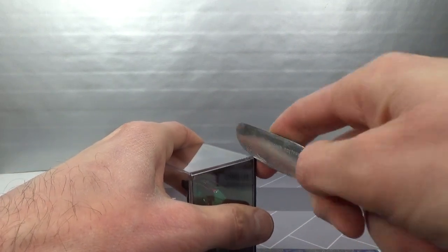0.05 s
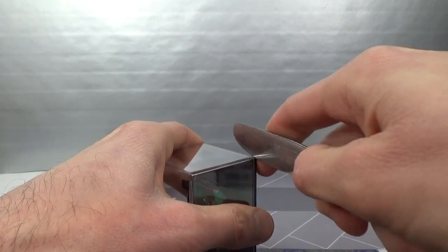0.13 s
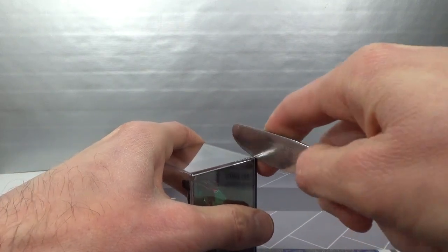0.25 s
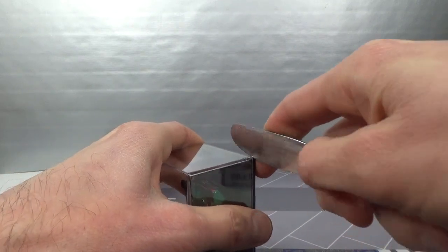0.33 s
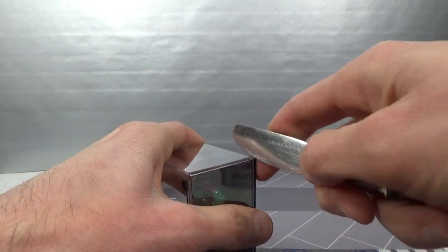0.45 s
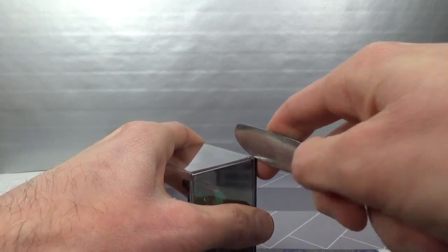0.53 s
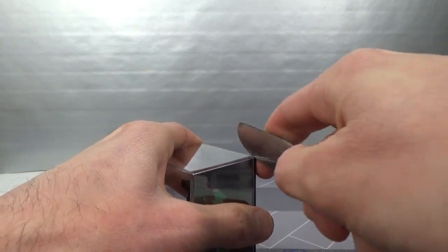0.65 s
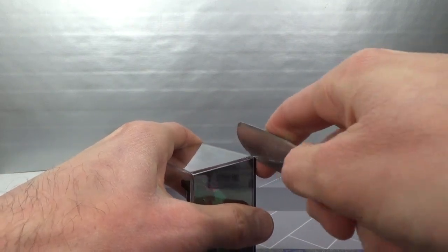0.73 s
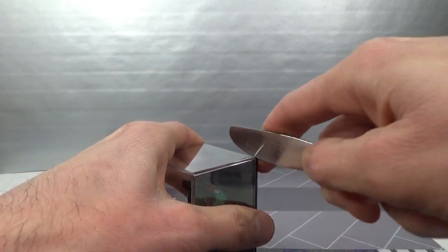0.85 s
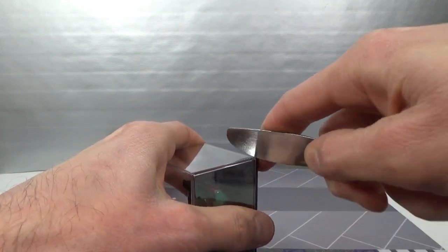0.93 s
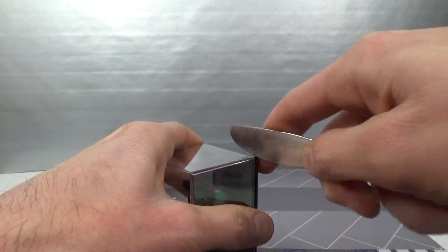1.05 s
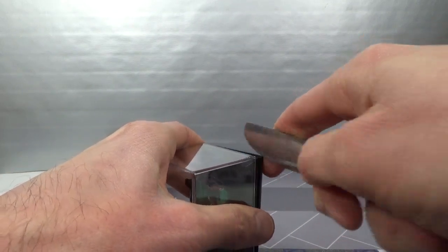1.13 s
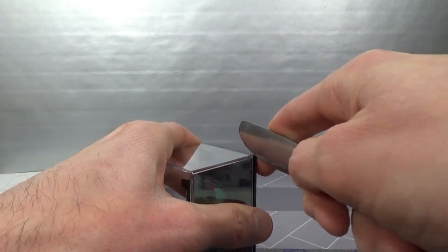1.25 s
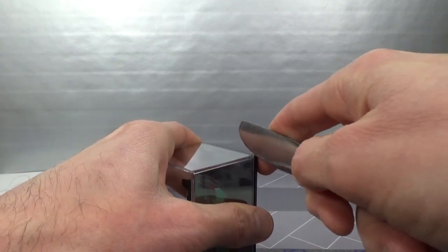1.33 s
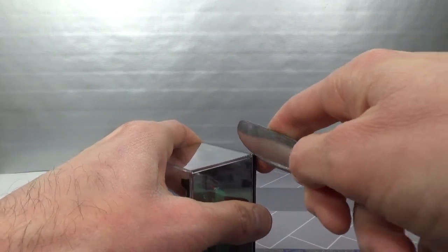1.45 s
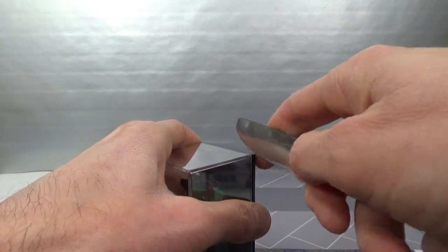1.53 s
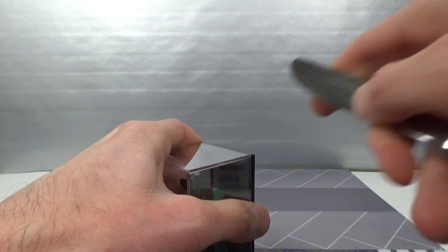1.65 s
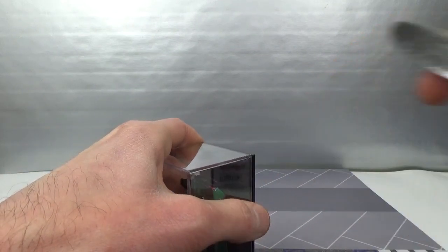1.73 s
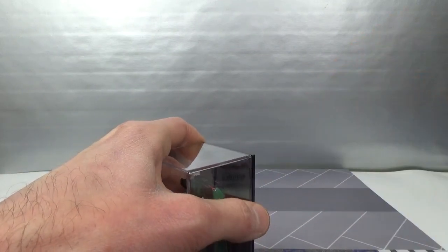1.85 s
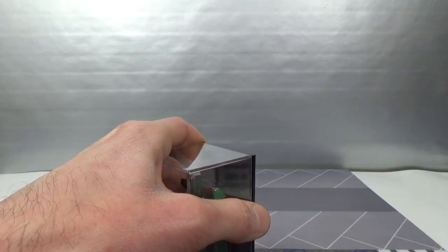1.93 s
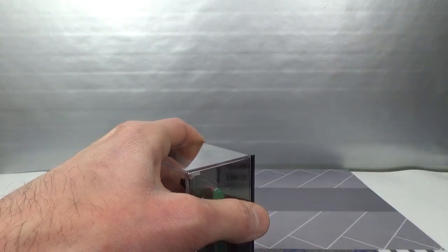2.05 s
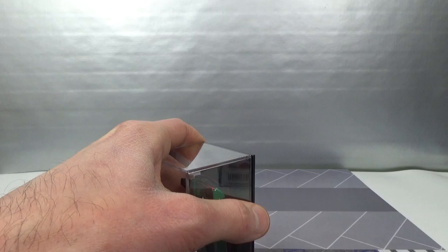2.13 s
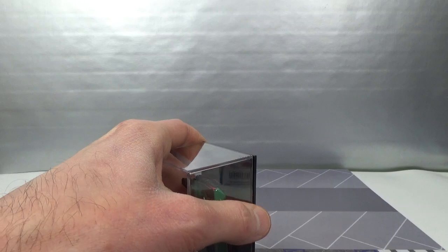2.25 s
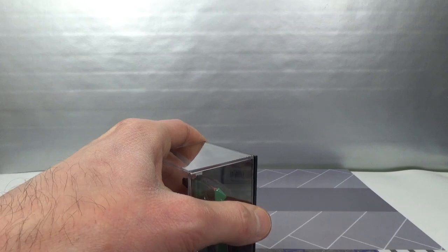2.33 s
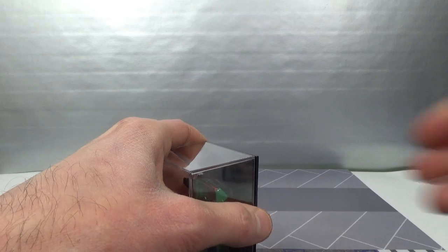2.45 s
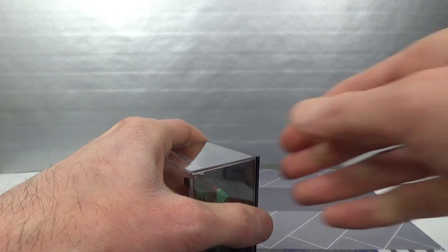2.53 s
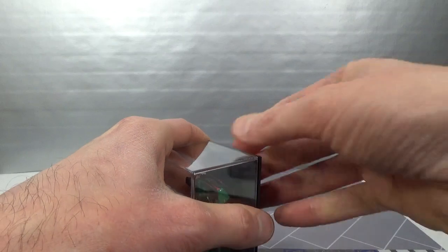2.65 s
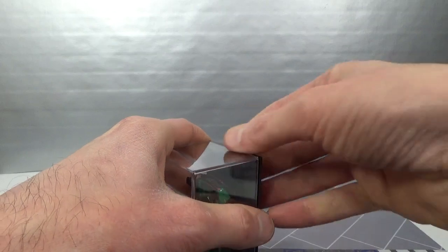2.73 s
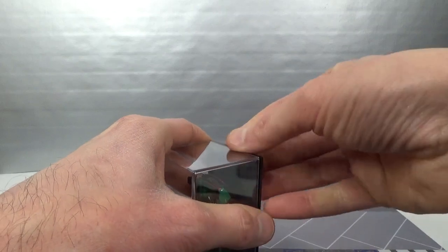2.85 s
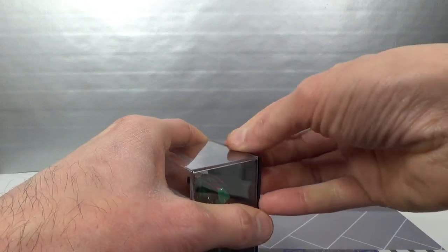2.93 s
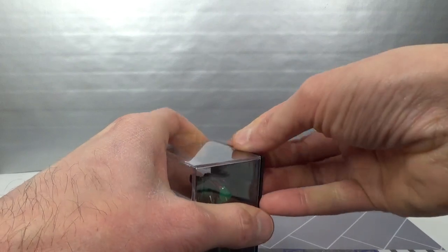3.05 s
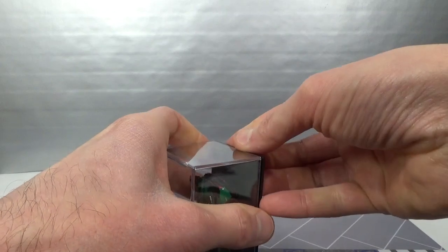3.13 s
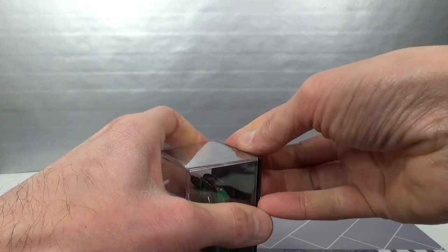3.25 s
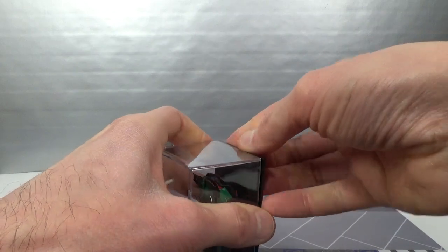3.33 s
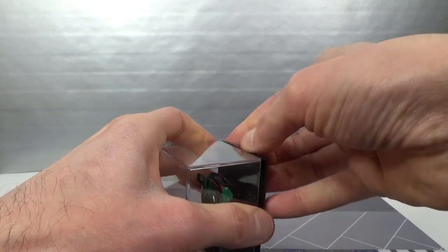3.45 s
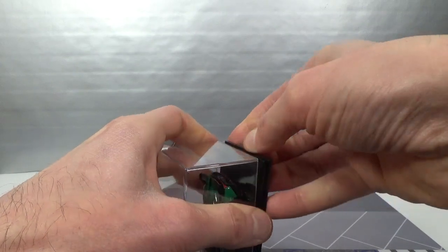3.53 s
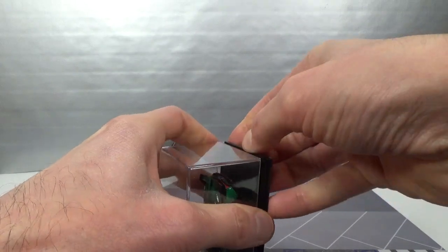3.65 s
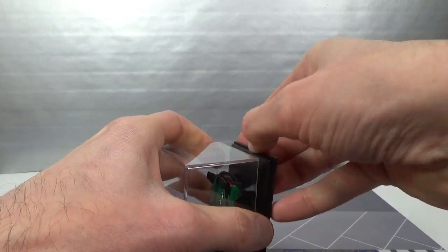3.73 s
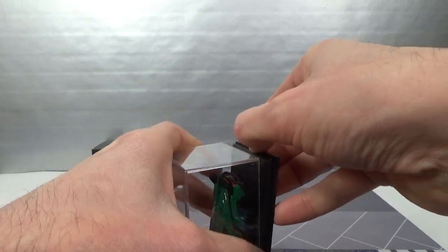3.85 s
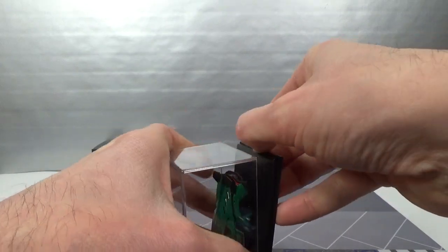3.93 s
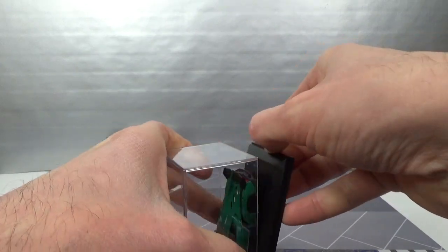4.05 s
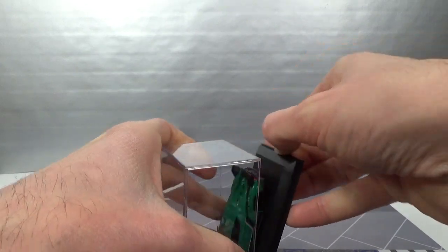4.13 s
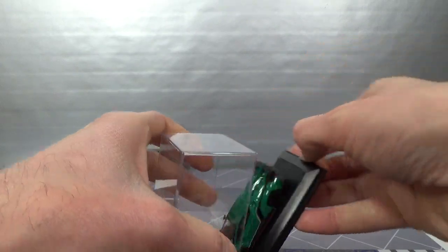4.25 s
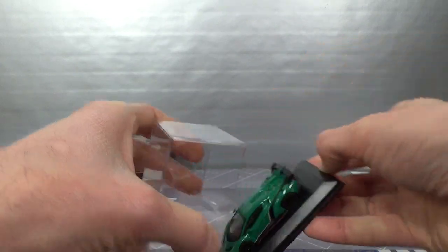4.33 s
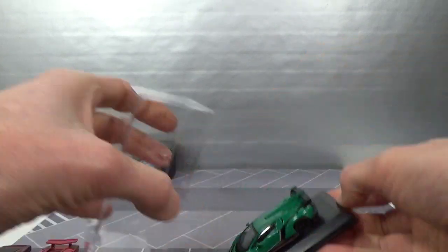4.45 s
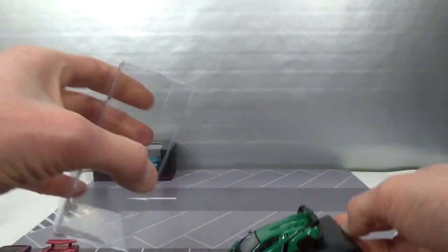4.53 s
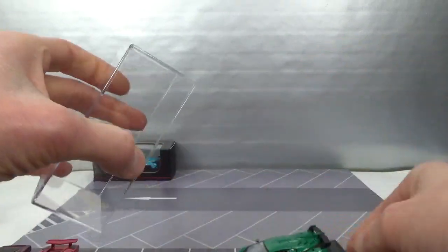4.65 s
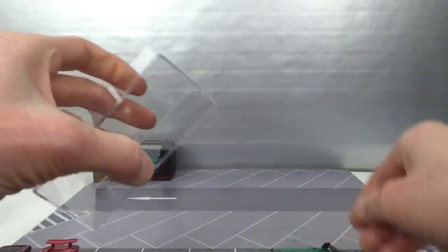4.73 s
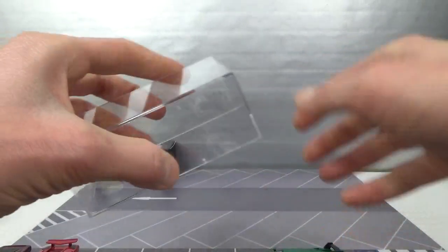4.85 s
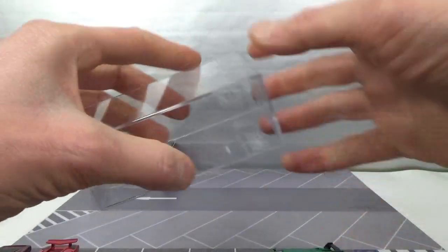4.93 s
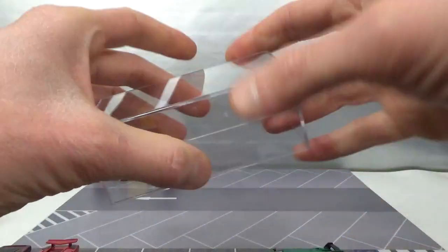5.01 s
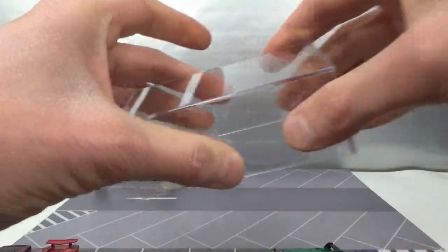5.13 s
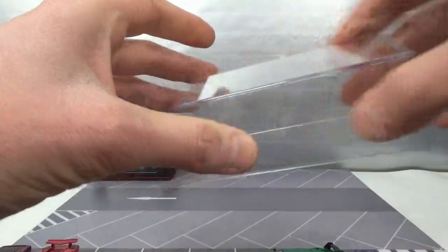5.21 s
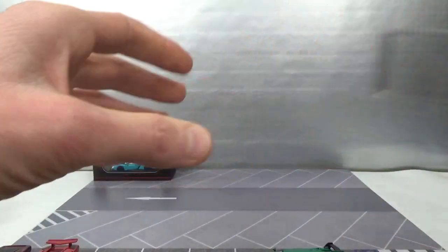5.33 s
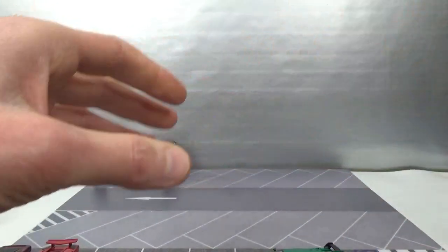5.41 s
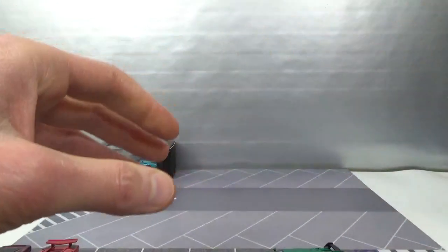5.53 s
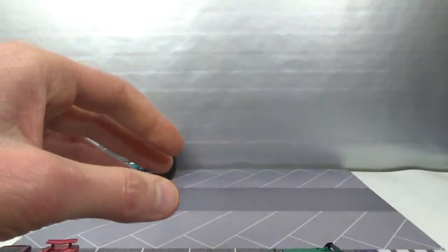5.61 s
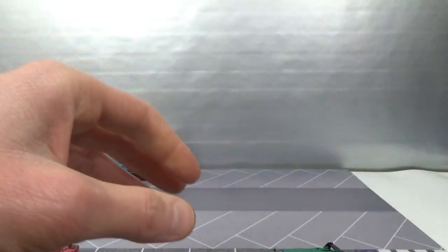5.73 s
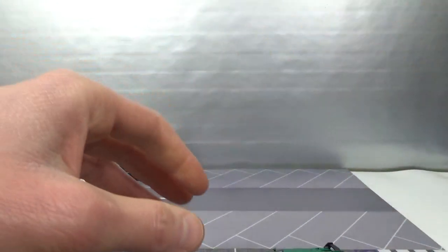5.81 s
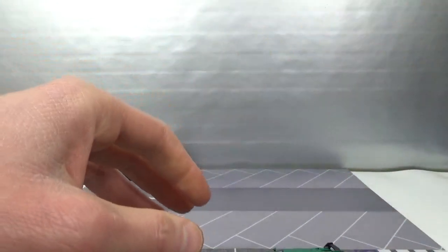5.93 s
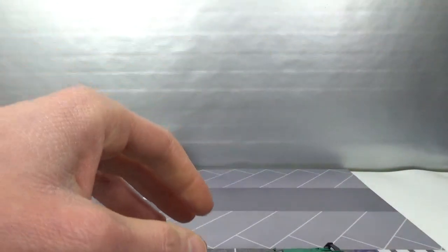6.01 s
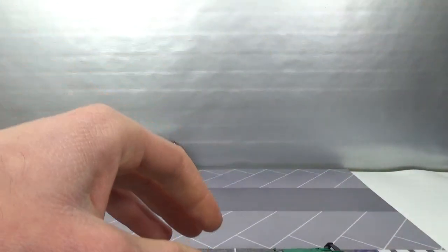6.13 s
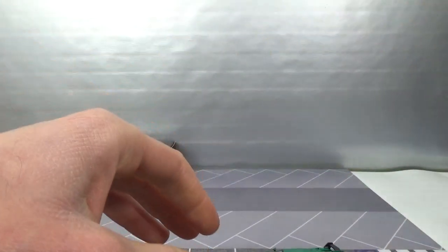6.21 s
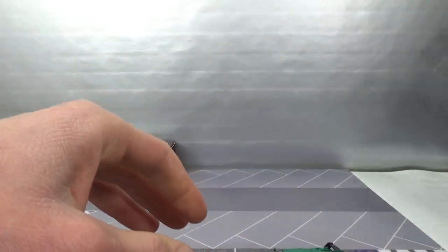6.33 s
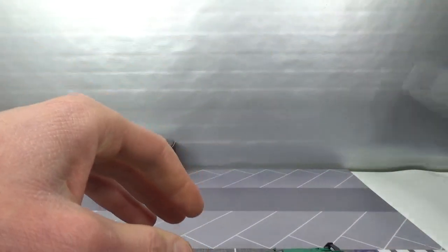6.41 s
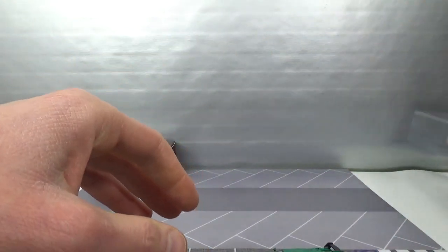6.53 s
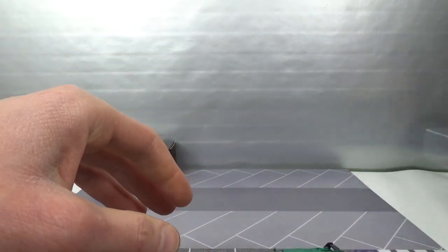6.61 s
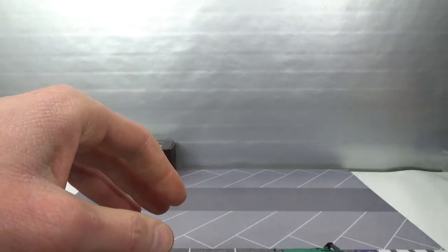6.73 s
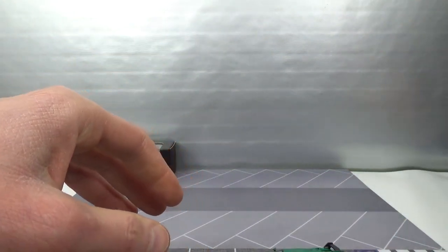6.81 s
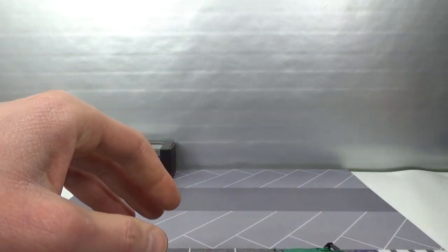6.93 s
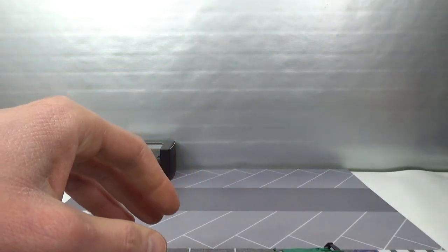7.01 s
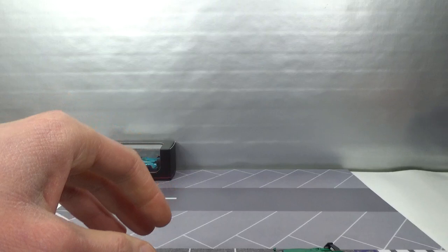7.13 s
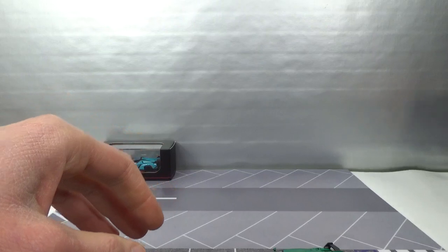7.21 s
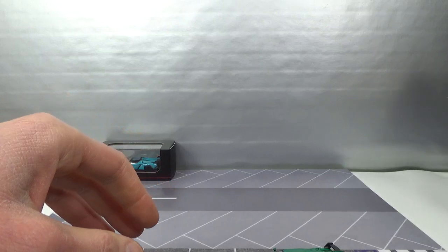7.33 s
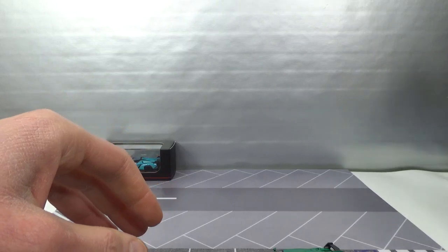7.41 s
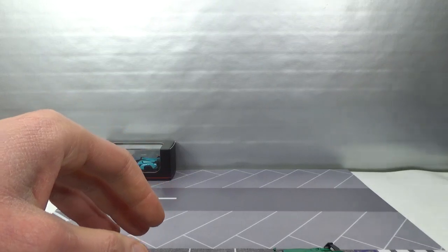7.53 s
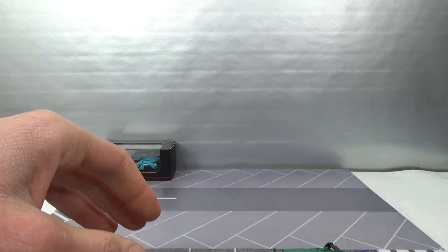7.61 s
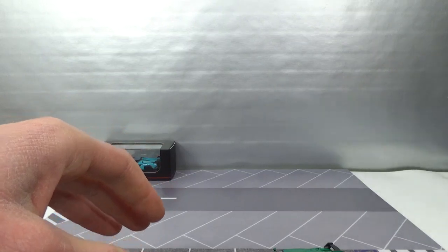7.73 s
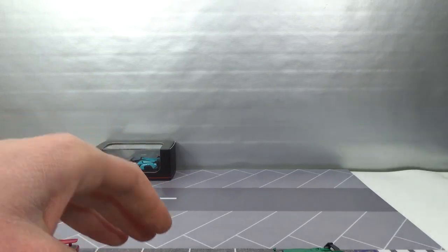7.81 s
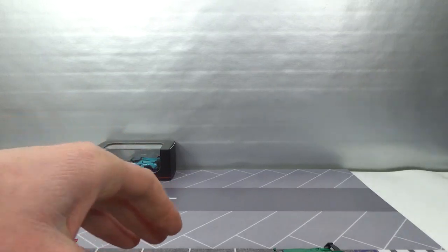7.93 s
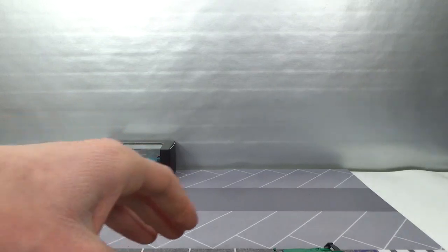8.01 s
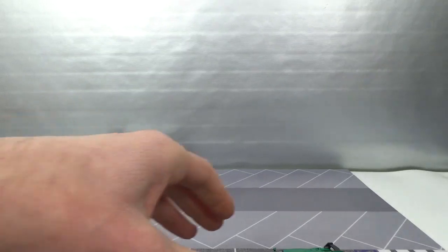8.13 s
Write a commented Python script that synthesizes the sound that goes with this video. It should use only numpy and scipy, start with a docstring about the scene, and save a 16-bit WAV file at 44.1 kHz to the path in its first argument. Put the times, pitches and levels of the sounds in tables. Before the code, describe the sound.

Close clicks and creaks of a hard plastic case being pried open, a loud snap, then thumps and a short knocking drag.

```python
"""In a small, quiet room, a clear plastic display case is tapped, then a table knife pries at its seam (1 s)
and is laid on a mat-covered table, its steel ringing (2.3 s). Fingers stick and slip on the walls in
short squeaks until the base snaps out of the cover (3.9 s). Base and cover are put down with soft
thumps (4.5 s), and the empty cover ticks and rings faintly as it is turned over (5 s). Last, further
right, a case is dragged a short way, knocking each time it catches on the mat (6.8 s)."""
import sys
import numpy as np
from scipy import signal
from scipy.fft import rfft, irfft
from scipy.io import wavfile
from scipy.ndimage import uniform_filter1d

SR = 44100
rng = np.random.default_rng(int(sys.argv[2]) if len(sys.argv) > 2 else 0)


def bounce(signal):
    """Save signal as a 16-bit WAV file at the path given by the first command-line argument."""
    frames = np.transpose(np.atleast_2d(signal))
    limited = np.clip(frames, -1, 1)
    pcm = np.round(limited * 32767).astype(np.int16)
    wavfile.write(sys.argv[1], SR, pcm)


N = 360297
T = np.arange(N) / SR
RING_T = T[:SR // 4]  # time axis of one hit and its tail


def undb(db):
    """Decibels to gain."""
    return 10 ** (np.asarray(db) / 20)


def add(out, s, x):
    """Mix x into out from time s on."""
    i = max(int(s * SR), 0)
    out[i:i + len(x)] += x[:max(len(out) - i, 0)]


def level(x, db=0):
    """Scale to an rms level."""
    return x * undb(db) / np.sqrt(np.mean(x ** 2))


def hit_level(x, db, length=.01):
    """Scale a short sound to the energy of that level held for length seconds."""
    return x * undb(db) * np.sqrt(length * SR / np.sum(x ** 2))


def on_bins(points, size):
    """Join (Hz, value) points over log frequency, on the bins of a transform."""
    hz, value = np.transpose(points)
    bin_hz = np.arange(size // 2 + 1) * SR / size
    return np.interp(np.log(bin_hz + 1), np.log(hz), value)


def colour(x, points):
    """Shape a steady sound with an EQ curve."""
    return irfft(rfft(x) * undb(on_bins(points, len(x))), len(x))


def response(points, size=1024):
    """Minimum-phase impulse response of an EQ curve."""
    cepstrum = irfft(np.log(undb(on_bins(points, size))))
    cepstrum[1:size // 2] *= 2
    cepstrum[size // 2 + 1:] = 0
    return irfft(np.exp(rfft(cepstrum)))


def through(x, impulse):
    """Drive an impulse response with x."""
    return signal.oaconvolve(x, impulse)[:len(x)]


def low_cut(x, hz):
    """Roll off the lows: small things radiate little bass."""
    return signal.sosfilt(signal.butter(2, hz, "high", fs=SR, output="sos"), x)


def fade(t60):
    """Exponential decay, 60 dB down after t60 seconds."""
    return np.exp(-np.log(1000) * RING_T / t60)


def grit(count, spread_db):
    """Tiny impacts of very unequal size."""
    return rng.standard_normal(count) * undb(spread_db * rng.standard_normal(count))


def wander(rate):
    """Smooth random drift with rate turning points a second, spread near 1."""
    knots = rng.standard_normal(N)
    return uniform_filter1d(np.interp(T * rate, np.arange(N), knots), int(SR / rate / 2) + 1)


# tone of the air and hiss: (frequency [Hz], relative level [dB])
AIR_EQ = [(15, -39.5), (25, -10), (69, -17), (81, -6.5), (101, -7), (156, -12), (207, -8.5), (372, -15.5),
          (907, -16), (1710, -22.5), (2450, -22.5), (5260, -27), (8750, -26.5), (11000, -29.5),
          (14300, -57), (22000, -120)]
# their stereo width: (frequency [Hz], side minus mid [dB])
AIR_SIDE_EQ = [(60, -18.5), (110, -14.5), (190, -12), (350, -3), (620, -1), (2000, -0.5), (6400, -6),
               (11400, -10)]


def room_tone(air_db=-63.5, hum_hz=100, hum_db=-69.5):
    """The bed: room air, microphone hiss and a faint wavering mains hum."""
    mid, side = (level(colour(rng.standard_normal(N), AIR_EQ), air_db) for _ in range(2))
    side = colour(side, AIR_SIDE_EQ)
    phase = 2 * np.pi * hum_hz * T + .4 * wander(rate=5)
    mid = mid + level(np.sin(phase) + undb(-8) * np.sin(2 * phase), hum_db)
    return np.array([mid + side, mid - side])


# the small room's tail: (band centre [Hz], t60 [s], level [dB])
REVERB_BANDS = [(70, .3, -14), (150, .3, -8.5), (300, 0.19, -6.5), (700, 0.17, -10), (1600, 0.16, -7.5),
                (4024, .21, -10.5), (9900, 0.16, -10.5)]


def reverb(x, predelay_s=.0017, wide_hz=600, width=.76):
    """Short diffuse reverberation; the bass lingers and stays near the centre."""
    size = len(RING_T)
    noise, tail = rfft(rng.standard_normal((2, size))), 0
    onset = np.clip(RING_T / predelay_s - 1, 0, 1)
    for hz, t60, db in REVERB_BANDS:
        band = on_bins([(row[0], row[0] == hz) for row in REVERB_BANDS], size)
        envelope = hit_level(fade(t60) * onset, db, 1 / SR)
        mid_side = np.array([[1], [width * hz / (hz + wide_hz)]])
        tail = tail + irfft(noise * band, size) * envelope * mid_side
    mid, side = through(x, tail[0]), through(x, tail[1])
    return np.array([mid + side, mid - side])


def ring(modes, length, scatter_db=1):
    """Free ringing that builds up during the contact; each point of contact favours other modes."""
    chance = rng.standard_normal((len(modes), 2))
    tone = sum(undb(db + scatter_db * nudge) * np.sign(flip) * fade(t60) * np.sin(2 * np.pi * hz * RING_T)
               for (hz, db, t60), (nudge, flip) in zip(modes, chance))
    return tone * (1 - np.exp(-2 * RING_T / length))


# modes of the clear cover: (frequency [Hz], relative level [dB], t60 [s])
COVER_MODES = [(900, -8.5, 0.14), (1116, -3.5, .16), (1550, -6, .06), (1850, -2.5, .06), (2085, 1.5, 0.06),
               (2343, 1.5, 0.068), (2960, -11, .07), (3280, -12.5, 0.088), (3440, -7.5, .05),
               (3833, -9.5, .06), (4352, -9, .07)]


def cover_ring(length):
    """The thin plastic cover rings after a contact of length seconds."""
    return ring(COVER_MODES, length)


# tone of brushing skin: (frequency [Hz], relative level [dB])
SKIN_EQ = [(100, -5.5), (400, 2.5), (1000, -2.5), (2400, -3.5), (5000, -5), (9500, 1.5), (11200, -9.5),
           (13000, -40)]
# hands passing over plastic and mat: (time [s], peak level [dB], half-width [s])
HAND_MOVES = [(0.374, -70, 0.029), (2.03, -57.5, 0.012), (2.807, -61, 0.03), (2.928, -61, 0.055),
              (3.266, -61, .007), (3.748, -61.5, 0.49), (4.224, -65.5, 0.17), (5.019, -45.5, 0.016),
              (5.098, -53, 0.021), (5.176, -57.5, 0.044), (5.419, -61.5, 0.021), (5.495, -70.5, 0.26),
              (6.153, -71, .1), (6.369, -58, .012), (6.483, -66, 0.21), (8.10, -58, 0.032)]


def hand_brushes(cover_db=-8.5, lift_s=4.1, let_go_s=5.9):
    """Soft swells of skin hiss; while the lifted cover is in the hands, they set it singing faintly."""
    pressure = sum(undb(db) * np.exp(-2 * ((T - s) / width) ** 2) for s, db, width in HAND_MOVES)
    hiss = pressure * level(colour(grit(N, spread_db=5), SKIN_EQ)) * undb(1.5 * wander(rate=60))
    on_cover = hiss * (T > lift_s) * (T < let_go_s)
    return hiss + through(on_cover, hit_level(cover_ring(length=.00091), cover_db, 1 / SR))


# weight landing on the table: (time [s], pitch [Hz], level [dB])
LANDINGS = [(.002, 150, -45), (0.359, 125, -58), (1.495, 158, -49.5), (1.548, 157, -45),
            (2.089, 160, -36.5), (2.1245, 150, -47), (2.291, 163, -24), (2.752, 65, -49.5),
            (3.042, 210, -45), (3.501, 200, -46.5), (3.639, 160, -47), (3.68, 110, -52), (3.819, 110, -41),
            (3.842, 110, -45), (3.86, 140, -45), (4.517, 123, -29.5), (4.782, 150, -23.5),
            (5.055, 170, -50), (5.202, 170, -54), (6.846, 206, -30.5), (8.011, 90, -50.5)]


def table_thumps(decay_cycles=.23, table_hz=156, table_t60=.14, hum_db=-12, build_s=.023):
    """The low end: the padded table gives way, swings back and hums on briefly at its own note."""
    out = np.zeros(N)
    hum = np.sin(2 * np.pi * table_hz * RING_T) * fade(table_t60) * (1 - np.exp(-(RING_T / build_s) ** 2))
    for s, hz, db in LANDINGS:
        cycles = hz * RING_T
        swing = cycles ** 2 * np.exp(-cycles / decay_cycles) * np.sin(2 * np.pi * cycles)
        add(out, s, hit_level(low_cut(swing, hz=41.6), db) + hit_level(hum, db + hum_db))
    return out


def hollow(hz, t60=.018, upper_ratio=1.563, upper_db=-8.5, cut_ratio=.52):
    """A damped body flexing as a whole: one note and a weaker one above it."""
    notes = np.sin(2 * np.pi * hz * RING_T) + undb(upper_db) * np.sin(2 * np.pi * hz * upper_ratio * RING_T)
    return low_cut(notes * fade(t60), cut_ratio * hz)


def clack(eq, t60, attack):
    """A sharp transient followed by a crowd of quickly dying modes."""
    impulse = hit_level(rng.standard_normal(len(RING_T)) * fade(t60), 0, 1 / SR)
    impulse[0] += attack
    return through(impulse, response(eq))


# tone of the walls, and of the crack at the contact point: (frequency [Hz], relative level [dB])
WALL_EQ = [(300, -28), (900, -6), (1400, 5.5), (2000, 4.5), (2700, -0.5), (3600, 0), (4600, -4.5),
           (6500, -15), (11000, -38)]
CRACK_EQ = [(1500, -30), (3500, -1.5), (4800, -0.5), (6200, 0.5), (7600, 0.5), (8700, 1), (10000, 1.5),
            (11200, -11), (13000, -42)]


def walls_and_crack():
    """The plastic's two upper layers, as impulse responses: midrange clack and bright crack."""
    return clack(WALL_EQ, t60=.018, attack=.75), clack(CRACK_EQ, t60=.016, attack=1)


def layer_levels(db, hardness_db, crack_db):
    """Split a level into body, walls and crack; hardness is walls over body, crack is crack over walls."""
    layers = np.array([0, hardness_db, hardness_db + crack_db])
    return db + layers - 10 * np.log10(np.sum(undb(layers) ** 2))


def contact(length, attack=.41):
    """A first impact, then edges chattering for length seconds; the briefest contacts are one clean hit."""
    chatter = grit(len(RING_T), spread_db=2.5) * np.exp(-(RING_T / length) ** 3)
    force = hit_level(chatter, 0, 1 / SR)
    force[0] += attack * (.0024 / length) ** 1.3
    return force


def strike(length, hz, db, hardness_db, crack_db, ring_db):
    """One contact drives body, walls and crack, and leaves the cover ringing."""
    force = contact(length)
    layers = low_cut(hollow(hz), .42 * hz), *walls_and_crack()
    levels = layer_levels(db, hardness_db, crack_db)
    knock = sum(hit_level(through(force, layer), layer_db) for layer, layer_db in zip(layers, levels))
    return knock + hit_level(cover_ring(length), db + ring_db)


# fingertips on the empty cover: (time [s], contact length [s], level [dB])
FINGERTIPS = [(4.9453, .005, -50), (5.0532, .0047, -52), (5.115, .0027, -46.5), (5.1597, .0044, -44),
              (5.1822, .0047, -49), (5.2012, .003, -49), (5.65, .0037, -59), (5.6892, .0035, -55)]


def cover_ticks(hz=1100, hardness_db=10.5, crack_db=-4.5, ring_db=-6):
    """The empty cover is turned over: thin ticks with little body."""
    out = np.zeros(N)
    for s, length, db in FINGERTIPS:
        add(out, s, strike(length, hz, db, hardness_db, crack_db, ring_db))
    return out


# tone of the walls under a sliding edge: (frequency [Hz], relative level [dB])
RUB_EQ = [(150, -5), (400, -17), (1000, -0.5), (1800, -2), (2800, -2), (3700, -4.5), (4600, -7.5),
          (6500, -13.5), (11000, -34.5)]


def scrape(envelopes, body_hz, judder_db):
    """An edge catches on countless specks under unsteady pressure; its motion blurs the fine modes."""
    force = grit(N, spread_db=5.5) * undb(judder_db * wander(rate=160))
    layers = hollow(body_hz, t60=.0089, upper_db=-11.5), response(RUB_EQ), response(CRACK_EQ)
    return sum(envelope * level(through(force, layer)) for envelope, layer in zip(envelopes, layers))


# short scrapes: (peak time [s], 20 dB rise [s], 20 dB fall [s], level [dB], hardness [dB], crack [dB])
SCRAPES = [(1.155, .025, .035, -43, -2, -2), (1.24, .12, .2, -56, -18, -3), (3.11, .11, .025, -50, -8, -1),
           (3.872, .033, .032, -27.5, 2, -9), (3.91, .03, .1, -46, 0, -5), (4.56, .025, .1, -50, 0, -6),
           (4.615, .07, .14, -46.5, 2.5, -4.5), (4.722, .04, .055, -35, 22, -5),
           (4.805, .025, .05, -35, -1.5, -8)]


def plastic_slides():
    """Plastic slides over plastic and mat in brief scrapes that swell and die away."""
    envelopes = 0
    for s, rise, fall, *mix in SCRAPES:
        swell_db = -20 * np.maximum((s - T) / rise, (T - s) / fall).clip(max=8)
        envelopes = envelopes + np.outer(undb(layer_levels(*mix)), undb(swell_db))
    return scrape(envelopes, body_hz=650, judder_db=2.5)


# the scrape along the mat: (start [s], stop [s], 20 dB fall [s], level between slips [dB], hardness [dB])
DRAG_MOVE = (6.753, 7.055, .06, -40.3, -1.5)
# snags on the mat: (time [s], contact length [s], body pitch [Hz], level [dB], hardness [dB])
SNAGS = [(6.758, .011, 630, -31.5, 2), (6.7875, .0067, 678, -29, -9), (6.811, .005, 595, -35.5, -14),
         (6.844, .0055, 670, -32, -2), (6.887, .002, 1040, -37.5, 3), (6.895, .0034, 770, -35.5, -3),
         (6.928, .0016, 680, -30.5, -7), (6.971, .003, 587, -31, -3.5), (7.028, .0078, 570, -29, 1),
         (7.048, .0054, 520, -37.5, 1)]
# pushes that start and end the drag: (time [s], half-width [s], rasp level [dB])
DRAG_PUSHES = [(6.768, .016, -41), (7.042, .02, -38.5)]


def case_drag(crack_db=-8, ring_db=-22.5, slip_db=3.5, slip_s=.018, wall_hz=2800):
    """A dragged case knocks at each snag and slips faster just after; a firm push makes its wall rasp."""
    start, stop, fall, db, hardness_db = DRAG_MOVE
    slip = sum((T > s) * np.exp(-np.abs(T - s) / slip_s) for s, *_ in SNAGS)
    speed = (T > start) * undb(slip_db * slip - 20 * np.maximum(T - stop, 0) / fall)
    envelopes = np.outer(undb(layer_levels(db, hardness_db, crack_db)), speed)
    out = scrape(envelopes, body_hz=610, judder_db=3)
    push = sum(undb(rasp_db) * np.exp(-((T - s) / width) ** 2) for s, width, rasp_db in DRAG_PUSHES)
    rasp = level(through(grit(N, spread_db=4), hollow(wall_hz, t60=.004, upper_db=-14)))
    out += (T > start) * push * rasp
    for s, *snag in SNAGS:
        add(out, s, strike(*snag, crack_db, ring_db))
    return out


# stick-slip of skin and tight plastic: (time [s], length [s], start rate [slips/s], end rate [slips/s],
# body pitch [Hz], roughness [0-1], level [dB], hardness [dB])
SLIP_TRAINS = [(2.823, .011, 530, 290, 700, .3, -39.5, -6), (2.879, .029, 312, 355, 660, .08, -41.5, -23),
               (3.348, .022, 260, 220, 1156, .27, -48, 5), (3.402, .0078, 320, 580, 850, .75, -44, 2),
               (3.411, .012, 420, 290, 1400, .54, -45, -8), (3.509, .021, 380, 520, 620, 1, -40.5, -3),
               (3.527, .02, 520, 640, 962, .6, -38.5, -8), (3.751, .031, 300, 346, 970, .9, -44, -6)]


def finger_squeaks(crack_db=-7):
    """Short, nearly regular trains of slips drive the case; roughness jitters their timing and force."""
    out = np.zeros(N)
    for s, length, start_rate, end_rate, hz, rough, db, hardness_db in SLIP_TRAINS:
        count = int(length * (start_rate + end_rate) / 2) + 1
        time_jitter, force_jitter = rough * rng.standard_normal((32, 2))[:count].T
        periods = np.exp(.1 * time_jitter) / np.linspace(start_rate, end_rate, count)
        slips = ((np.cumsum(periods) - periods[0]) * SR).astype(int)
        force = np.zeros(len(RING_T))
        force[slips] = undb(4 * force_jitter) * np.hanning(count + 2)[1:-1] ** .3
        # the pressing finger damps the body, so every low harmonic comes through
        layers = hollow(hz, t60=.009, upper_db=-8, cut_ratio=.25), *walls_and_crack()
        for layer, layer_db in zip(layers, layer_levels(db, hardness_db, crack_db)):
            add(out, s, hit_level(through(force, layer), layer_db, length))
    return out


# modes of the steel knife: (frequency [Hz], relative level [dB], t60 [s])
STEEL_MODES = [(2280, -2, .06), (2840, 3, 0.036), (4775, -1.5, 0.2), (6130, -8, 0.18), (6901, -13, .12),
               (8750, 2.5, 0.24), (8985, -9, 0.21), (10200, -1, .06)]
# hits on the knife: (time [s], contact length [s], knock [dB], clack [dB], steel ring [dB])
KNIFE_HITS = [(1.14, 0.01, -52, -39.5, -57), (1.169, .003, -61, -64, -60),
              (2.2792, 0.0091, -43, -49.5, -67), (2.2912, 0.0027, -26.5, -36, -42.5)]


def knife_clinks(knock_hz=245):
    """The blade slips off the seam and later is laid down: what it hits knocks, and the steel rings."""
    out = np.zeros(N)
    body = hollow(knock_hz, t60=.032, upper_db=-17)
    walls, crack = walls_and_crack()
    for s, length, knock_db, clack_db, ring_db in KNIFE_HITS:
        force = contact(length)
        add(out, s, hit_level(through(force, body), knock_db))
        add(out, s, hit_level(through(force, walls + crack), clack_db))
        add(out, s, hit_level(ring(STEEL_MODES, length), ring_db))
    return out


# the blade bites into the seam: (time [s], contact length [s], level [dB])
BITES = [(1.062, .0014, -53), (1.0683, .0018, -47), (1.085, .0022, -44.5), (1.097, .0024, -48),
         (1.112, .0025, -38), (1.132, .008, -39), (1.1395, .0064, -28.5), (1.148, .0019, -32),
         (1.1531, .0031, -33), (1.168, .002, -41), (1.2143, .0012, -42), (1.2414, .0013, -39),
         (1.2689, .0014, -39), (1.4916, .0078, -40), (1.5495, .0054, -46), (1.561, .0027, -47)]
# tone of the bites as the blade sinks in: (time [s], body pitch [Hz], hardness [dB])
BITE_TONE = [(1.06, 1350, 7), (1.15, 720, 5.5), (1.215, 900, -5), (1.27, 720, -7), (1.55, 640, -20)]


def knife_pries(crack_db=1.5, ring_db=-24):
    """Sharp cracks at the lip of the seam turn to dull knocks as the blade goes deeper."""
    out = np.zeros(N)
    times, pitches, hardness = np.transpose(BITE_TONE)
    for s, length, db in BITES:
        hz, hardness_db = np.interp(s, times, pitches), np.interp(s, times, hardness)
        add(out, s, strike(length, hz, db, hardness_db, crack_db, ring_db))
    return out


# fingers and plastic edges knock on the case:
# (time [s], contact length [s], body pitch [Hz], level [dB], hardness [dB], crack [dB])
CASE_HITS = [(.002, .018, 1200, -42.5, -7, -6), (.079, .001, 1120, -53.5, -6, -11),
             (2.753, .0026, 1370, -52, 1, -9), (2.775, .002, 850, -56.5, -11, 0),
             (2.7887, .0013, 653, -51.5, -2, -8), (2.854, .0024, 665, -55, -21, 1),
             (3.043, .0008, 644, -37, -16, 5), (3.469, .0011, 580, -54, -8, -2),
             (3.501, .0034, 930, -37, 1, 0), (3.595, .0013, 980, -48.5, -7, 0),
             (3.616, .0062, 780, -42.5, -3.5, 5), (3.6261, .0013, 640, -37, -10, 0),
             (3.634, .0023, 586, -39, -7, -15), (3.6444, .0018, 700, -35.5, -18, -2),
             (3.677, .0046, 680, -52, 0, -7), (3.686, .0024, 626, -44, -21, 1),
             (3.7269, .009, 795, -49.5, -1, -3), (3.8208, .0024, 1020, -33, 2, 5),
             (3.825, .002, 1050, -31.5, 4, -5), (3.837, .0031, 1010, -39, -1, 4),
             (3.8445, .012, 1040, -30, -7.5, -2.5), (3.8584, .0094, 966, -15, 4.5, -1.5),
             (3.8745, .0028, 766, -27.5, 13, -19), (4.0428, .0019, 780, -44, 1, -2.5),
             (4.1245, .0034, 1080, -51.5, -17, 8), (4.136, .0018, 1190, -51, -6, -5),
             (4.1493, .0016, 1160, -41.5, -14, -3), (4.1806, .0018, 1030, -35.5, -2.5, -11),
             (4.5163, .004, 780, -27, 0, -2), (4.54, .0022, 790, -33.5, 4, -6),
             (4.553, .0018, 1000, -43, 12, 6), (4.67, .002, 1010, -47, -15, 13),
             (4.7809, .00054, 716, -16.5, -5.5, -2.5)]
# the cover rings more as the grip loosens, less as it tightens: (time [s], ring relative to the hit [dB])
GRIP_RING = [(3.68, -21), (3.8, -13), (4.15, -13), (4.18, -4.5), (4.54, -16), (4.78, -23)]
# modes of the base: (frequency [Hz], relative level [dB], t60 [s])
BASE_MODES = [(444, -12, .13), (722, -2.5, .12), (952, -1, 0.11), (1541, 0.5, .07), (1646, -4.5, .08),
              (1830, 0.5, .07), (2183, -3.5, .09), (2475, 2.5, .07), (2948, -9, .07), (4090, -6.5, 0.076),
              (4360, -11, .08), (4885, -5, .075), (6072, -11, .07), (7750, -10, .06), (9965, -8.5, .06)]
# the base springs free: (time [s], time to let go [s], ring level [dB])
BASE_RELEASE = (3.859, .005, -20.5)


def case_snaps():
    """Taps and snaps; the cover rings on when the hand lets it, the base when it springs free."""
    out = np.zeros(N)
    for s, *hit in CASE_HITS:
        ring_db = np.interp(s, *np.transpose(GRIP_RING))
        add(out, s, strike(*hit, ring_db))
    s, length, db = BASE_RELEASE
    add(out, s, hit_level(ring(BASE_MODES, length), db))
    return out


def pan(x, right_db):
    """Make the right channel louder than the left by right_db."""
    return x * undb(np.array([[-right_db], [right_db]]) / 2)


def scene(aside_from_s=6.6, aside_send_db=3.5):
    """The hands work near the middle; from the drag on, the sounds sit further right with more reverb."""
    foley = knife_pries() + case_snaps() + cover_ticks() + table_thumps() + knife_clinks()
    foley += finger_squeaks() + plastic_slides() + case_drag() + hand_brushes()
    near, aside = foley * (T < aside_from_s), foley * (T >= aside_from_s)
    direct = pan(near, right_db=1.34) + pan(aside, right_db=3.5)
    return direct + reverb(near + undb(aside_send_db) * aside) + room_tone()


def record(dry, top_hz=11150):
    """The nearby camera cuts the top octave with a steep low-pass."""
    return signal.sosfilt(signal.ellip(10, .2, 70, top_hz, fs=SR, output="sos"), dry)


dry = scene()
out = record(dry)
bounce(out)
```